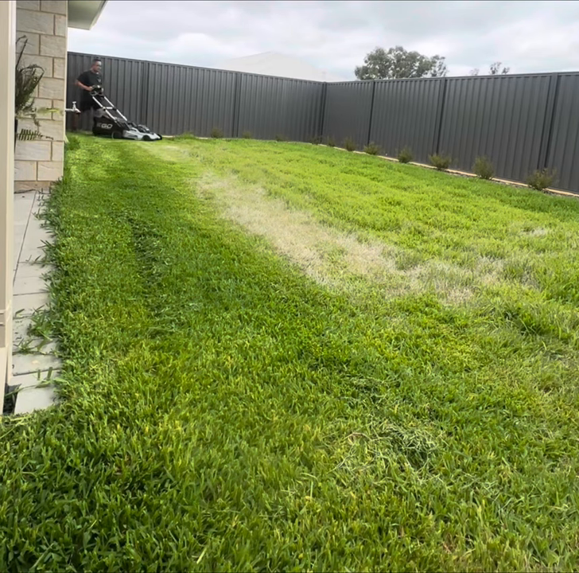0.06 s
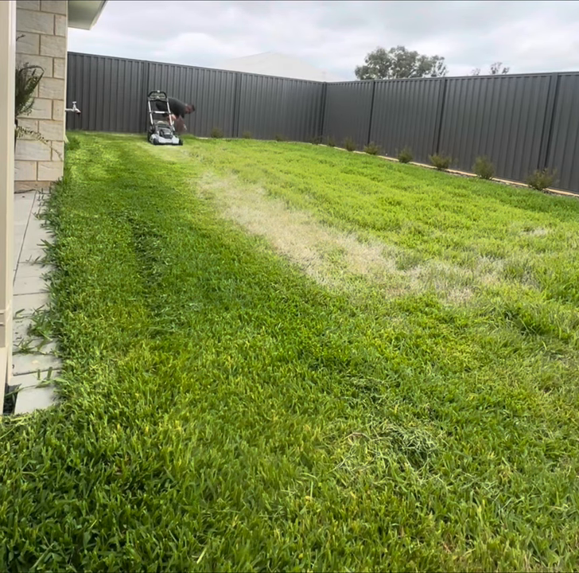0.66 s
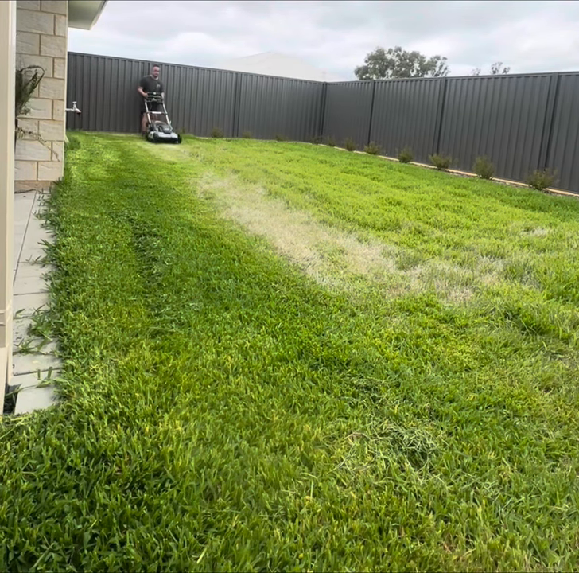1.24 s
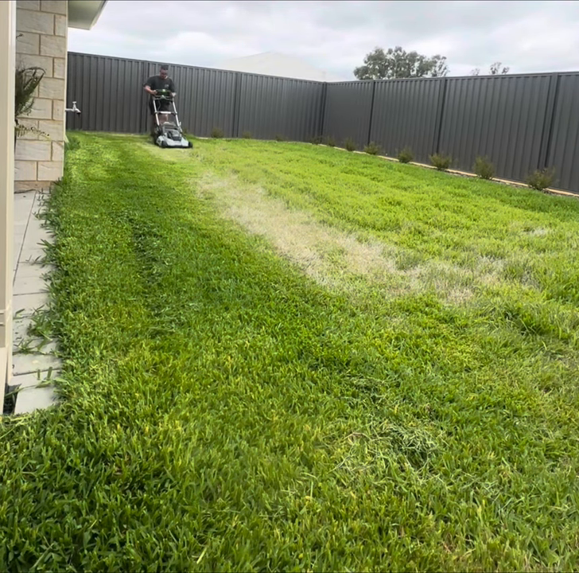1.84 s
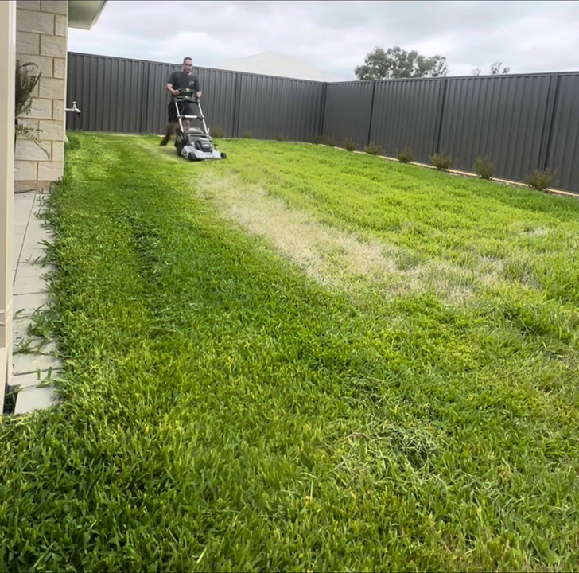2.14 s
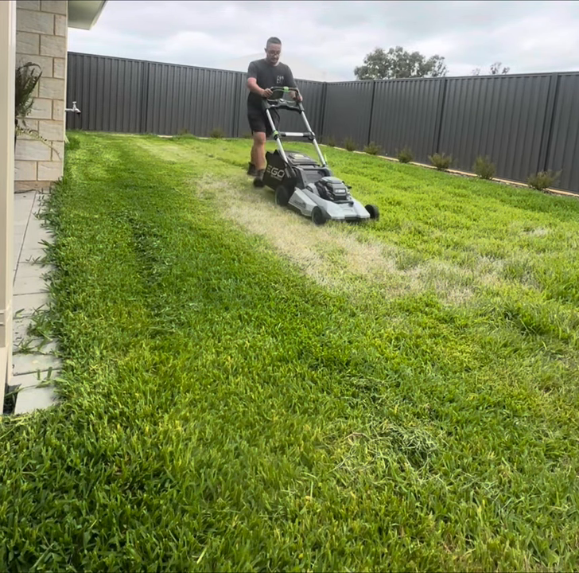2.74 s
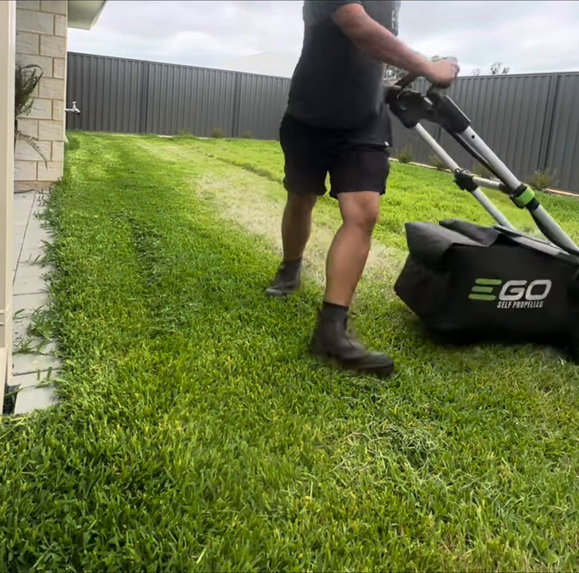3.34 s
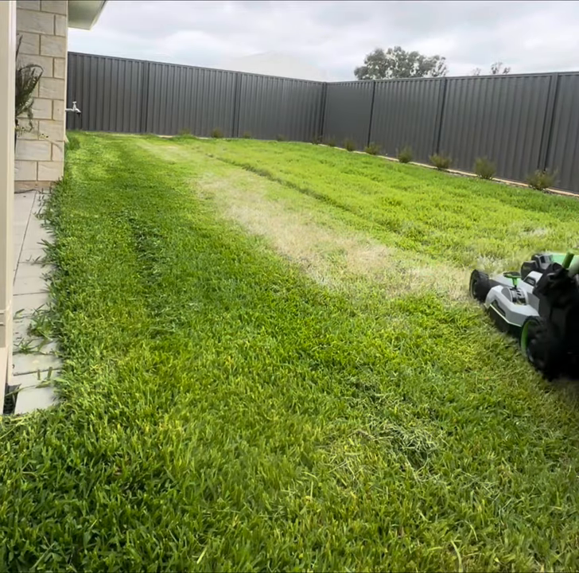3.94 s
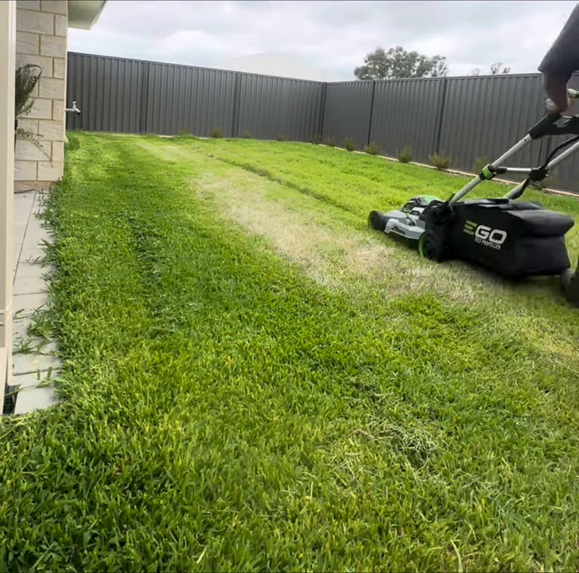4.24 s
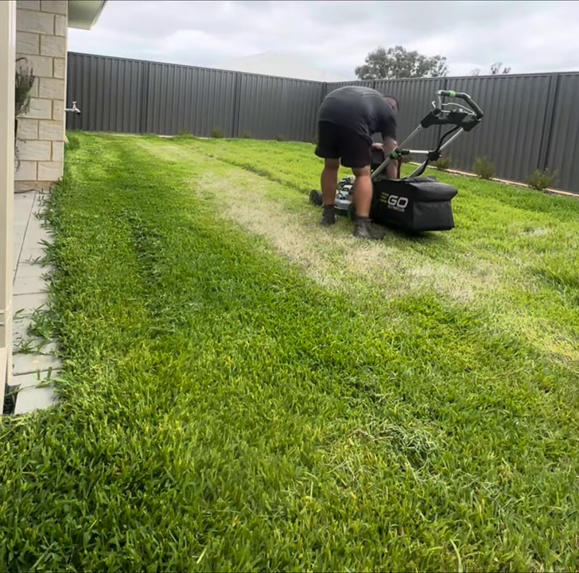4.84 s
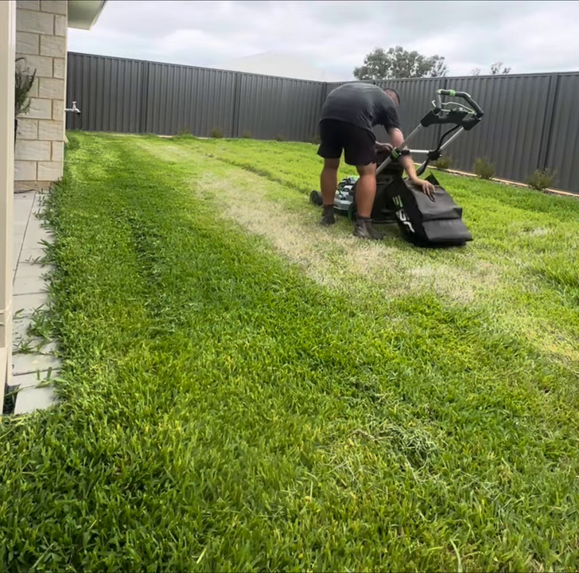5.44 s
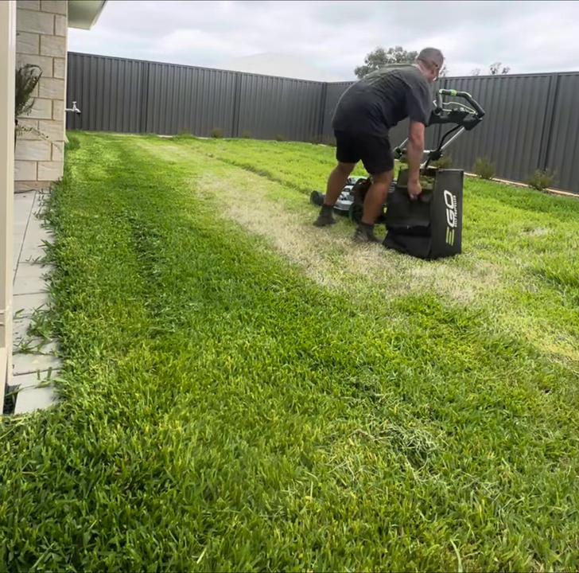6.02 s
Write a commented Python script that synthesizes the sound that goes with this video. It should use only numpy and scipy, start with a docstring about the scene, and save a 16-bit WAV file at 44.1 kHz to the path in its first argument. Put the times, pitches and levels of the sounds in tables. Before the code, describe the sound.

A battery lawn mower hums briefly and runs down, leaving a quiet outdoor hush. It restarts with a rising whine and approaches, air roaring under its deck, wet grass hissing and its body booming over bumps. Stalks snap as it passes close to the microphone. The wheel motor whines, then everything winds down. The fabric grass catcher rustles softly and unhooks with one sharp plastic clack.

```python
"""A humming, roaring battery mower runs down, starts again, is pushed past through wet grass and stops.
Its blade hums and sags under load, air roars in the deck (the shell over the blade), and grass hisses.
The wheel motor whines, and the body booms over the bumpy lawn of a fenced yard.
Then the grass catcher rustles and is unhooked with one sharp clack, over a quiet outdoor hush."""
import sys
import numpy as np
from scipy import signal
from scipy.fft import rfft, irfft
from scipy.io import wavfile
from scipy.ndimage import uniform_filter1d

SR = 44100
rng = np.random.default_rng(int(sys.argv[2]) if len(sys.argv) > 2 else 0)


def generate_wav(signal):
    """Clip the signal to [-1, 1] and save it as 16-bit WAV at the path in sys.argv[1]."""
    frames = np.transpose(np.atleast_2d(signal))
    scaled = np.clip(frames, -1, 1) * 32767
    pcm = np.round(scaled).astype(np.int16)
    wavfile.write(sys.argv[1], SR, pcm)


N = 272538
T = np.arange(N) / SR
FREQ = np.fft.rfftfreq(N, 1 / SR)


def undb(db):
    """Turn decibels into a gain to multiply by."""
    return 10 ** (np.asarray(db) / 20)


def curve(rows, column):
    """One column of a table, joined by straight lines in time."""
    rows = np.array(rows)
    return np.interp(T, rows[:, 0], rows[:, column])


def levels(spans, column, fade_s=0.17):
    """Gain from a dB column, fading to silence outside each span of rows."""
    gain = np.zeros(N)
    for rows in spans:
        inside_s = np.minimum(T - rows[0][0], rows[-1][0] - T)
        gain += undb(curve(rows, column)) * np.clip(1 + inside_s / fade_s, 0, 1)
    return gain


def strike(age, rise_s, t60_s):
    """Gain that rises quickly, then dies away by 60 dB every t60_s seconds."""
    age = np.maximum(age, 0)
    return (1 - np.exp(-(age / rise_s) ** 2)) * undb(-60 * age / t60_s)


def swells(rows):
    """Gain of sounds that rise to a peak and fall away again."""
    return sum(undb(db) * np.exp(-((T - s) / half_s) ** 2) for s, db, half_s in rows)


def shape(points):
    """Gain at each frequency, from points of (frequency [Hz], level [dB])."""
    hz, db = np.transpose(points)
    return undb(np.interp(np.log(FREQ + 1), np.log(hz), db))


def resonance(hz, width_hz):
    """A bell-shaped peak that favours the frequencies near hz."""
    return 1 / (1 + ((FREQ - hz) / width_hz) ** 2)


def wobble(rate_hz):
    """A smooth random wobble, about 1 in size."""
    hold = int(SR / rate_hz)
    steps = rng.standard_normal(2000)[np.arange(N) // hold]
    smooth = uniform_filter1d(uniform_filter1d(steps, hold), hold)
    return smooth / smooth.std()


def echo(x, delay_s):
    """Each channel again, after a delay that may change."""
    return np.array([np.interp(T - delay_s, T, channel, left=0) for channel in x])


# How wide the noise sounds: (frequency [Hz], side minus middle [dB])
STEREO_WIDTH = [(25, 2), (45, -6), (70, 5.5), (140, -2), (280, 1.5), (550, 3.5), (1000, 1.5), (4000, -1),
                (12000, 1.5)]
# Which way it leans: (frequency [Hz], left minus right [dB])
STEREO_LEAN = [(60, 2.5), (200, -3.5), (380, 2.5), (550, 7.5), (800, 1), (1300, -0.5), (1900, -2.5),
               (2400, 2.5), (4000, 0.5), (12000, 0)]


def noise(colour, band=(20, 20000), grain_db=0):
    """Stereo noise whose middle has strength 1 within the band [Hz]; grain makes it crackle."""
    grains = undb(grain_db * np.repeat(rng.standard_normal(N // 32 + 1), 32)[:N])
    mid, side = rfft(rng.standard_normal((2, N)) * grains) * colour
    side = side * shape(STEREO_WIDTH)
    lean = np.sqrt(shape(STEREO_LEAN))
    inside = (FREQ > band[0]) & (FREQ < band[1])
    return irfft(np.array([(mid + side) * lean, (mid - side) / lean]), N) / irfft(mid * inside, N).std()


def harmonic(cycles, order, flutter, spread):
    """A tone at a multiple of the blade's rate; swirling air shakes it differently on each side."""
    shared = 1 + flutter * (wobble(28.316) + 1j * wobble(28.15))
    sides = np.array([shared + spread * (wobble(14) + 1j * wobble(12)) for _ in range(2)])
    strength = np.sqrt(.5 + flutter ** 2 + spread ** 2 / 2)
    return np.real(sides * np.exp(2j * np.pi * order * cycles)) / strength


# The blade, one span running down and one passing by:
# (time [s], blade-passing rate [Hz], harmonic 2 [dB], harmonic 3 [dB], harmonic 4 [dB])
BLADE_HUM = [
    [(0.0, 86.4, -63, -55, -68), (0.04, 88.3, -30.5, -49, -61), (0.1, 95.4, -39, -68, -35),
     (0.176, 90.4, -36.5, -43, -43), (0.23, 88.26, -41, -45.5, -41), (0.38, 97.96, -31.5, -57, -57),
     (0.424, 88.9, -38, -36.5, -57), (0.462, 74.6, -36, -50, -66), (0.5, 65.55, -57, -53, -56),
     (0.62, 44.8, -81, -58, -55)],
    [(1.74, 56.0, -72, -53, -60), (1.83, 76.8, -39.5, -49, -63), (1.87, 84.5, -45, -68, -56),
     (1.93, 94, -33, -45, -41), (1.97, 99, -37.5, -43, -58), (2.02, 97.2, -32.5, -60, -41),
     (2.17, 98.74, -35, -31, -57), (2.2, 97.34, -36, -43, -34.5), (2.54, 103.2, -38.5, -59, -44.5),
     (2.62, 107.9, -34.5, -43, -33), (2.66, 105.2, -43, -51, -48), (2.72, 106.8, -30, -52, -29),
     (2.75, 106.5, -36.5, -62, -49), (2.8, 106.0, -24.5, -43, -55), (2.85, 103, -31.5, -31, -24),
     (2.93, 97.76, -35, -49, -54), (2.99, 94.85, -29.5, -41, -29.5), (3.06, 95.2, -40, -37, -50),
     (3.18, 91.08, -23, -33, -21), (3.21, 95.13, -28, -45, -50), (3.24, 98.54, -33, -33.5, -22),
     (3.29, 103.3, -21, -24.5, -48), (3.33, 105.7, -26.5, -46, -25), (3.36, 105.3, -33.5, -19.5, -35.5),
     (3.5, 101.9, -18, -47, -43), (3.55, 99.56, -22.5, -28, -39), (3.63, 98.87, -37, -38, -41),
     (3.67, 97.75, -27, -38, -67), (3.83, 95.26, -34.5, -36, -53), (3.89, 89, -31, -30, -25.5),
     (3.93, 85.06, -42, -29.5, -52), (4.06, 93, -28.5, -28, -37), (4.11, 90.2, -38, -30.5, -36),
     (4.24, 87.16, -47, -37.5, -57), (4.29, 92.8, -40, -52, -49), (4.35, 98.3, -27, -37, -52),
     (4.39, 96.36, -33, -63, -52), (4.46, 85.15, -43, -44, -67), (4.47, 80.5, -46, -32, -36),
     (4.66, 42.55, -70, -80, -63)],
]
CAVITY_HZ, CAVITY_T60_S = 128.3, 0.42  # pitch and ring time of the hollow under the deck


def blade_hum(cycles):
    """The blade tips hum as they pass the deck wall, and set the air under the deck booming."""
    second, third, fourth = (levels(BLADE_HUM, column) for column in (2, 3, 4))
    hum = undb(1) * second * harmonic(cycles, order=2, flutter=0.19, spread=0.13)
    hum += undb(-0.5) * third * harmonic(cycles, order=3, flutter=0.28, spread=0.44)
    hum += undb(-3.5) * fourth * harmonic(cycles, order=4, flutter=0.29, spread=0.67)
    cavity = undb(-5) * second * noise(resonance(CAVITY_HZ, 3.5))
    return (hum + cavity) * undb([[-1.3], [1.3]])  # a little to the right


# Air rushing under the deck, one span for each run: (time [s], low roar [dB], high roar [dB])
ROAR_LEVELS = [
    [(0, -41.5, -50), (.146, -44, -51), (.21, -42, -48.5), (.378, -39.5, -44.5), (.47, -48.5, -52.5),
     (.682, -63.5, -67.5), (.7, -81, -80)],
    [(1.45, -74, -65.5), (1.57, -43, -51.5), (1.65, -54, -54.5), (1.95, -44, -45), (2.23, -39.5, -41.5),
     (2.4, -36, -40), (2.62, -36.5, -37), (2.9, -36.5, -35.5), (3.0, -35, -36), (3.08, -30.5, -33.5),
     (3.19, -27, -32), (3.23, -46, -27), (3.31, -41, -28), (3.4, -34, -33.5), (3.54, -40, -36),
     (3.62, -36, -39.5), (3.69, -39, -38), (3.98, -37.5, -39.5), (4.16, -34.5, -40), (4.33, -36, -43),
     (4.41, -40.5, -44), (4.63, -52.5, -64), (4.7, -95, -99)],
]
# Tone colours of the low and the high roar: (frequency [Hz], level [dB])
LOW_ROAR_COLOUR = [(30, -28), (120, 8.5), (240, 5), (330, 3), (420, 0), (600, -2.5), (720, 0), (1000, -46),
                   (2000, -97)]
HIGH_ROAR_COLOUR = [(350, -23), (600, -7), (740, 0.5), (900, -3.5), (1040, -4), (1180, -10.5), (1340, -3),
                    (1560, -14.5), (1800, -22), (2250, -19.5), (3000, -28.5), (4500, -68)]


def air_roar(blade_hz, repeat=0.25):
    """Air roars in the deck; each blade tip meets the swirls left by the one before."""
    low = undb(-3) * noise(shape(LOW_ROAR_COLOUR), band=(350, 680))
    high = undb(-1.7) * noise(shape(HIGH_ROAR_COLOUR), band=(700, 1150))
    roar = low * levels(ROAR_LEVELS, column=1) + high * levels(ROAR_LEVELS, column=2)
    period_s = 1 / np.maximum(blade_hz, 60)
    roar = roar + repeat * echo(roar, period_s) + repeat ** 2 * echo(roar, 2 * period_s)
    return roar * undb(1.84 * wobble(31.9))


def blade_whirr(cycles, step_db=-1.27):
    """The blade's harmonics 5 to 11 glide with its speed and swell with the high roar."""
    tones = sum(undb(step_db * k) * harmonic(cycles, 5 + k, flutter=.6, spread=.8) for k in range(7))
    return undb(-11.5) * tones * levels(ROAR_LEVELS, column=2) * undb([[1.5], [-1.5]])


# Grass being shredded, one span for each run: (time [s], level [dB])
CUTTING_LEVELS = [
    [(0, -65), (.15, -62), (.27, -62), (.35, -57.5), (.45, -64), (.6, -75)],
    [(1.6, -75), (1.8, -64.5), (1.93, -63), (2.01, -56), (2.12, -55.5), (2.3, -55.5), (2.42, -52.5),
     (2.56, -55.5), (2.64, -48), (2.72, -51.5), (2.9, -50.5), (2.98, -48.5), (3.06, -48), (3.13, -43.5),
     (3.2, -48.5), (3.31, -47), (3.42, -53.5), (3.62, -61), (3.84, -63.5), (3.87, -53.5), (3.92, -63),
     (3.98, -64), (4.08, -58), (4.18, -54.5), (4.35, -56), (4.5, -62), (4.65, -82)],
]
# Tone colour of its hiss: (frequency [Hz], level [dB])
HISS_COLOUR = [(1100, -22), (1800, -4), (2300, -3), (3500, -9.5), (4000, -12), (4700, -12), (6600, -10.5),
               (9300, -18.5), (11000, -22.5), (15500, -30)]
# How the hiss is duller at first: (frequency [Hz], change [dB])
EARLY_DULLING = [(2300, 3), (4000, 1), (6500, 1.5), (12000, -6)]


def grass_cutting(bright_at_s=2.26):
    """Wet grass is shredded in a fine, uneven crackle that brightens at about two seconds."""
    bright = noise(shape(HISS_COLOUR), band=(3500, 10000), grain_db=1.5)
    dull = noise(shape(HISS_COLOUR) * shape(EARLY_DULLING), band=(3500, 10000), grain_db=1.5)
    brightness = np.clip(1 + 2 * (T - bright_at_s), 0, 1)
    hiss = np.sqrt(brightness) * bright + np.sqrt(1 - brightness) * dull
    flicker = undb(.8 * wobble(25))
    return undb(-3) * hiss * levels(CUTTING_LEVELS, column=1) * flicker


# Tone colour of the quiet outdoors: (frequency [Hz], level [dB])
YARD_COLOUR = [(22, -11), (53, 5), (95, -5.5), (135, 2), (200, -10.5), (354, -20), (520, -16.5),
               (700, -19.5), (1100, -23), (1600, -26.5), (2600, -24.5), (3100, -28), (3900, -39.5),
               (6300, -32.5), (8000, -51), (11000, -65.5), (15000, -72)]


def yard_hush():
    """A steady outdoor hush, with a light breeze stirring the bass."""
    hush = noise(shape(YARD_COLOUR), band=(300, 15000))
    bass = irfft(rfft(hush) * resonance(50, 130), N)
    breeze = undb(-4 + 2.2 * wobble(18))
    return undb(-58) * (hush + bass * (breeze - 1))


# The mower jolts on the lawn: (time [s], level [dB], pitch [Hz], rise time [s])
JOLTS = [(0.06, -27.5, 83, 0.013), (0.233, -33.5, 61.6, 0.012), (.275, -14.5, 112.6, 0.033),
         (0.298, -26.5, 61, 0.015), (.417, -31, 95, 0.0059), (0.769, -43.5, 197, 0.0075),
         (1.152, -38, 199, 0.0087), (1.17, -53, 62, 0.0071), (1.545, -36.5, 69.6, 0.009),
         (1.561, -33.5, 176, 0.011), (1.549, -41, 295, 0.0092), (1.901, -29, 98.26, 0.011),
         (1.956, -16, 126.6, 0.02), (1.959, -19, 194.3, .018), (2.09, -21.5, 115.9, 0.011),
         (2.329, -11.5, 121.5, 0.027), (2.384, -22.5, 119.9, 0.0094), (2.579, -9, 107, 0.034),
         (2.748, -10, 108.7, 0.021), (2.819, -17.5, 120.1, 0.017), (3.005, -19.5, 103, 0.011),
         (3.228, -6, 108.2, 0.019), (3.285, -8.5, 128, 0.026), (3.42, -17.5, 111, 0.015),
         (3.63, -14.5, 108.9, 0.017), (3.729, -11, 112, 0.02), (3.785, -13, 111.7, 0.014),
         (3.846, -22, 109, 0.013), (3.974, -29, 102.8, .012), (4.139, -26, 119, 0.0091),
         (4.201, -19.5, 119.5, 0.017), (4.357, -10.5, 113.5, 0.019), (4.46, -26.5, 158.2, 0.0071)]


def lawn_bumps():
    """Each jolt comes through the soft tyres as a boom and a dull rattle, and leaves the deck ringing."""
    boom, push = np.zeros(N), np.zeros(N)
    for s, db, hz, rise_s in JOLTS:
        age = T - s
        swell = undb(db + 10) * strike(age, rise_s, t60_s=0.11)
        ring = undb(db - 6) * strike(age, rise_s=0.032, t60_s=CAVITY_T60_S)
        boom += swell * np.sin(2 * np.pi * hz * age) + ring * np.sin(2 * np.pi * CAVITY_HZ * age)
        push += swell
    rattle = noise(shape([(25, -31), (70, 4.5), (100, -16.5), (200, 17.5), (350, 2.5),
                          (900, -33.5), (3000, -80.5)]))
    return boom * undb([[-1.5], [1.5]]) + undb(-16) * push * rattle


# Stalks hit the deck: (time [s], snap [dB], knock [dB], snap fade time [s])
STALK_HITS = [(0.147, -51, -44, .03), (0.157, -52, -34, .025), (3.1596, -35, -38, 0.0099),
              (3.1625, -27, -28, 0.023), (3.1657, -31, -25, 0.021), (3.174, -38, -35, .02),
              (3.257, -18.5, -38, 0.0046), (3.858, -46, -45, 0.28), (4.478, -53, -34, 0.029)]


def stalk_snaps(rise_s=0.00045):
    """Tough stalks snap and knock against the deck, and their shreds spatter after."""
    burst, knock = np.zeros(N), np.zeros(N)
    for s, snap_db, knock_db, t60_s in STALK_HITS:
        shreds = undb(-15) * strike(T - s, rise_s, t60_s=0.057)
        burst += undb(snap_db) * (strike(T - s, rise_s, t60_s) + shreds)
        knock += undb(knock_db) * strike(T - s, rise_s, t60_s=0.041)
    spatter = noise(shape([(300, 9), (1200, 11), (2300, 9.5), (4200, -5.5), (6800, 2.5),
                           (10000, -35), (15000, -48)]))
    deck = noise(resonance(800, 400))
    return burst * spatter + knock * deck


# Soft thuds while the blade is still: (peak time [s], level [dB], pitch [Hz])
TURF_THUDS = [(.735, -37, 56.1), (0.796, -39, 66), (.83, -41, 54), (.882, -41.5, 72), (1.027, -38, 55),
              (1.27, -43, 60), (1.303, -41.5, 110), (4.793, -42.5, 43.5), (4.833, -52, 109),
              (4.872, -45, 46), (4.932, -42.5, 72), (5.012, -46, 58), (5.488, -35.5, 67), (5.618, -32, 79),
              (5.816, -42.5, 79), (6.14, -40.5, 74)]


def turf_thuds(half_s=0.013):
    """Boots, wheels and bag settle on the turf, each with a short, dull thud and a scuff."""
    thump = sum(swells([(s, db, half_s)]) * np.cos(2 * np.pi * hz * (T - s)) for s, db, hz in TURF_THUDS)
    weight = swells([(s, db, half_s) for s, db, _ in TURF_THUDS])
    scuff = noise(shape([(25, 0), (55, -5), (130, 5), (220, -6.5), (600, -27), (2000, -55), (12000, -90)]))
    return thump + undb(-15) * weight * scuff


# The wheel motor spins up freely (first span), then labours: (time [s], pitch [Hz], level [dB])
MOTOR_WHINE = [
    [(1.56, 560, -54), (1.592, 670, -57), (1.611, 730, -39.5), (1.632, 810, -48), (1.655, 980, -51),
     (1.688, 1200, -43), (1.706, 1260, -51), (1.728, 1370, -54), (1.755, 1480, -54), (1.772, 1400, -58),
     (1.79, 1340, -47), (1.812, 1400, -48), (1.828, 1460, -45), (1.862, 1510, -43), (1.888, 1700, -47),
     (1.92, 1620, -60)],
    [(2.25, 1540, -58), (2.38, 1530, -40), (2.5, 1460, -52), (2.6, 1350, -48), (2.93, 1340, -33),
     (3.1, 1370, -41), (3.28, 1340, -52), (3.45, 1340, -63)],
    [(4.1, 1310, -39), (4.128, 1340, -27), (4.155, 1375, -33.5), (4.2, 1380, -37), (4.235, 1345, -33.5),
     (4.26, 1350, -31.5), (4.286, 1355, -23), (4.31, 1370, -44), (4.33, 1375, -34), (4.363, 1350, -32.5),
     (4.395, 1290, -38), (4.42, 1310, -45), (4.472, 1320, -59), (4.51, 1350, -40), (4.58, 1300, -58)],
]
# Its gears rasp: (peak time [s], level [dB], half length [s], pitch [Hz])
GEAR_RASPS = [(1.771, -62, 0.031, 2450), (1.829, -56, .016, 2080), (1.837, -68, .012, 2900),
              (3.736, -57, 0.12, 2230), (4.123, -53, .016, 2640), (4.2, -52, 0.026, 2200),
              (4.288, -57, 0.039, 2220), (4.381, -52, 0.021, 2170), (4.468, -58, .015, 2102)]


def wheel_motor(chatter_hz=110, side_ratio=1.135):
    """The motor's whine glides with its load; its gears chatter, rasp and add a higher side tone."""
    hz = curve(np.vstack(MOTOR_WHINE), column=1)
    cycles = np.cumsum(hz * (1 + .012 * wobble(260))) / SR
    loaded_at_s = MOTOR_WHINE[1][0][0]
    slack = undb(7 * (T < loaded_at_s))  # loose gears chatter more
    chatter = undb(-11) * slack
    teeth = resonance(0, chatter_hz) ** 2
    rough = (1 + chatter * (noise(teeth) + 1j * noise(teeth))) / np.hypot(1, 2 * chatter)
    whine = np.real(rough * np.exp(2j * np.pi * cycles))
    side_tone = undb(-12.5) * np.real(rough[::-1] * np.exp(2j * np.pi * side_ratio * cycles))
    octave = undb(-30) * slack ** 2 * np.real(rough ** 2 * np.exp(4j * np.pi * cycles))
    housing = undb(-15) * noise(resonance(1420, 130))
    rasp = sum(swells([(s, db, half_s)]) * noise(resonance(rasp_hz, 110))
               for s, db, half_s, rasp_hz in GEAR_RASPS)
    loudness = undb(-2) * levels(MOTOR_WHINE, column=2, fade_s=.03)
    return (whine + side_tone + octave + housing) * loudness + rasp


# The lawn swallows part of the roar, lower in pitch as the mower nears:
# (peak time [s], half length [s], pitch [Hz], share lost [0-1])
SWALLOWED_BANDS = [(2.15, 0.39, 830, 0.54), (2.74, 0.17, 784, 0.2)]


def over_lawn(sound, width_hz=163):
    """Sound that skims the soft grass from far away loses some of its middle pitches."""
    spectrum = rfft(sound)
    lost = sum(share * swells([(s, 0, half_s)]) * irfft(spectrum * resonance(hz, width_hz), N)
               for s, half_s, hz, share in SWALLOWED_BANDS)
    return sound - lost


# The deck rings as it shows different sides: (peak time [s], level [dB], half length [s], pitch [Hz])
DECK_RINGS = [(2.279, -40.5, 0.082, 711.5), (2.58, -35, 0.12, 619.8), (2.84, -33, 0.093, 528),
              (3.002, -31.5, 0.12, 539.6), (3.5, -38, 0.061, 897.2), (3.704, -33, 0.15, 867),
              (4.045, -35.5, 0.061, 826), (4.128, -38.5, 0.046, 564.3)]


def hollow_deck():
    """The space under the deck adds a hollow ring whose pitch shifts as the mower turns."""
    return sum(swells([(s, db, half_s)]) * noise(resonance(hz, 60)) for s, db, half_s, hz in DECK_RINGS)


# The bag's cloth slides and its rim rubs: (peak time [s], level [dB], half length [s])
CLOTH_SLIDES = [(5.1, -65, 0.13), (5.36, -54.5, 0.073), (5.76, -56, 0.09), (6.02, -57, 0.1)]
RIM_RUBS = [(5.37, -57, 0.07), (5.665, -38, 0.019), (5.888, -49, 0.018), (5.99, -58, 0.024)]
# The bag is tugged and knocked: (time [s], level [dB], fade time [s])
BAG_TUGS = [(5.474, -40, 1), (5.559, -37, 0.72), (5.69, -22.5, 0.088), (5.776, -37, 0.55), (6.126, -47, .2)]


def catcher_bag(rise_s=0.0056):
    """The fabric bag rustles and rumbles, and its plastic rim rubs as it is lifted."""
    fabric = noise(shape([(30, -4), (70, -1), (140, 4.5), (280, -10.5), (450, -21), (700, -27),
                          (2000, -39), (6000, -62), (15000, -87)]))
    rumble = fabric * sum(undb(db) * strike(T - s, rise_s, t60_s) for s, db, t60_s in BAG_TUGS)
    rub = undb(-2.5) * swells(RIM_RUBS) * noise(resonance(1350, 105))
    rustle = swells(CLOTH_SLIDES) * noise(resonance(640, 230))
    return rumble + rub + rustle


# The notes that the catcher and its latch ring at: (pitch [Hz], level [dB], fade time [s])
FRAME_NOTES = [(176.5, 1, 0.04), (267, -7, 0.046), (330, -13.5, 0.047), (594, -55, 0.1), (800, -41.5, 0.21),
               (1216, -33, 0.098), (1355, -34, 0.15), (1994, -35, 0.11), (2230, -32, 0.082),
               (2265, -38, 0.073), (4300, -31, 0.026)]
# The latch slips, then snaps:
# (time [s], ring [dB], ring rise time [s], crack [dB], crack rise time [s], crack fade time [s])
LATCH_HITS = [(5.645, -9, 0.0082, -31, 0.0031, 0.093), (5.653, -1, 0.0056, -35, 0.0051, 0.12),
              (5.6624, -10.5, 0.0015, -28.5, 0.00066, 0.019), (5.664, -3, 0.0021, -20, 0.00023, 0.0067),
              (5.691, -28, .006, -46, .005, 0.061)]


def latch_clack():
    """The latch scrapes, snaps with one sharp crack and rings the catcher's plastic frame."""
    ring, burst = np.zeros((2, N)), np.zeros(N)
    for s, ring_db, rise_s, crack_db, crack_rise_s, crack_t60_s in LATCH_HITS:
        age = T - s - np.array([[0], [.0002]])  # the ring reaches the right side later
        for hz, note_db, t60_s in FRAME_NOTES:
            ring += undb(ring_db + note_db) * strike(age, rise_s, t60_s) * np.cos(2 * np.pi * hz * age)
        burst += undb(crack_db) * strike(age[0], crack_rise_s, crack_t60_s)
    crack = burst * noise(shape([(300, 14.5), (550, 7.5), (1200, 2), (2200, 2.5), (3500, -7.5),
                                 (6000, -13), (9000, -25), (15000, -42)]))
    bass_cut = signal.butter(2, 125, "high", fs=SR, output="sos")  # a small frame gives off little bass
    return signal.sosfilt(bass_cut, ring) + crack


def scene():
    """The mower crosses the yard, then the catcher comes off."""
    blade_hz = curve(np.vstack(BLADE_HUM), column=1)
    cycles = np.cumsum(blade_hz) / SR
    mower = blade_hum(cycles) + over_lawn(air_roar(blade_hz) + blade_whirr(cycles))
    mower = mower + hollow_deck() + grass_cutting() + wheel_motor() + lawn_bumps() + stalk_snaps()
    return mower + turf_thuds() + catcher_bag() + latch_clack() + yard_hush()


def record(dry):
    """Cut away the highest treble, above 15600 Hz."""
    return signal.sosfilt(signal.ellip(8, .2, 70, 15600, fs=SR, output="sos"), dry)


dry = scene()
out = record(dry)
generate_wav(out)
```